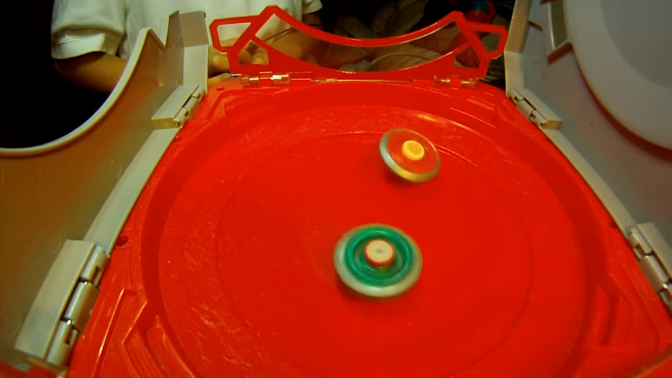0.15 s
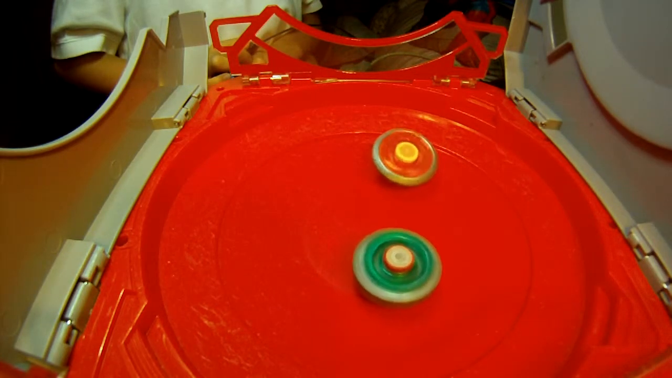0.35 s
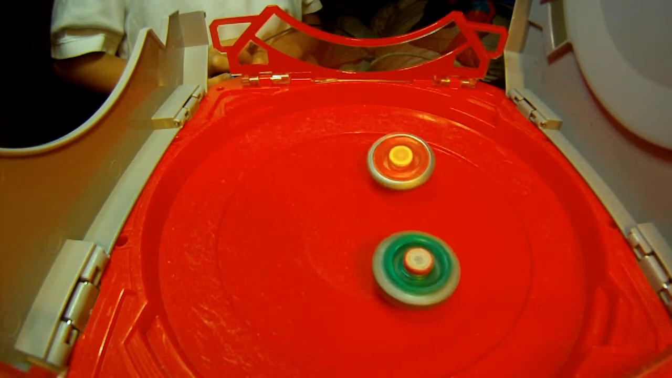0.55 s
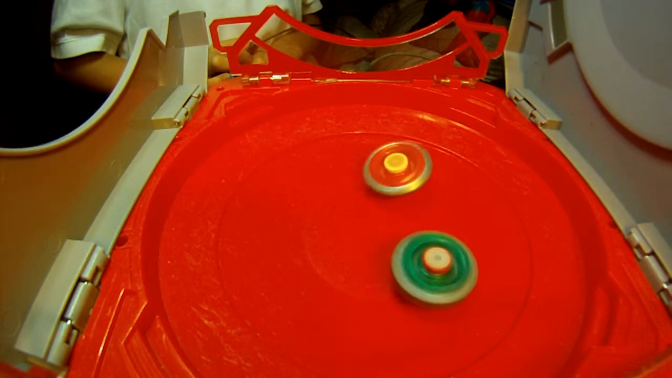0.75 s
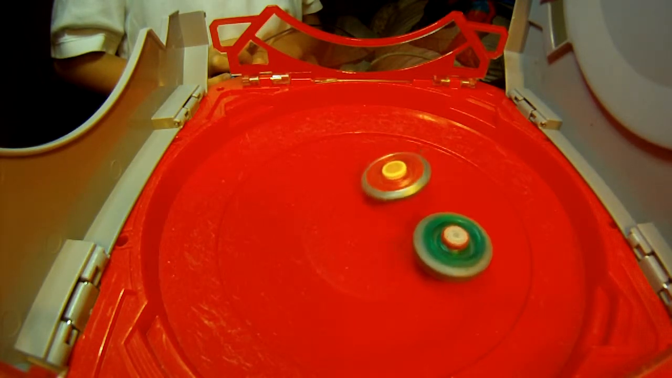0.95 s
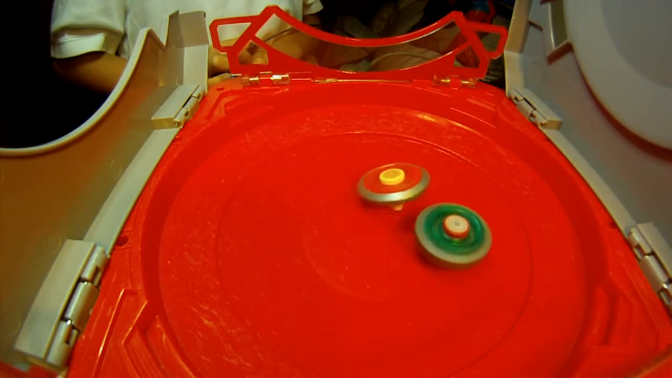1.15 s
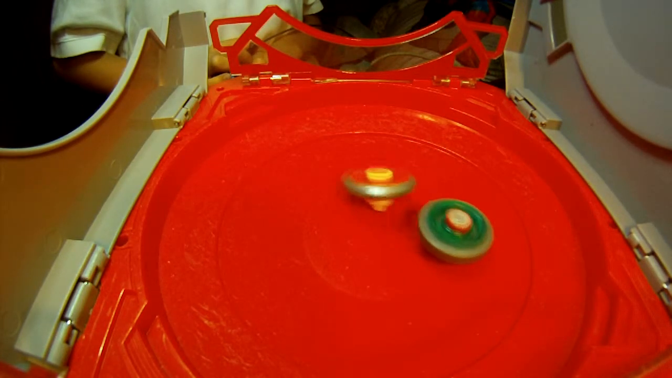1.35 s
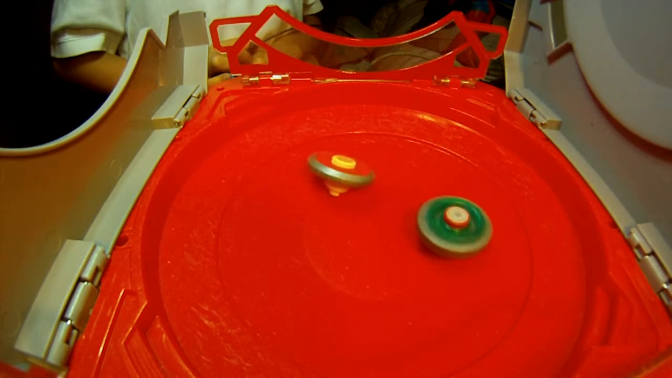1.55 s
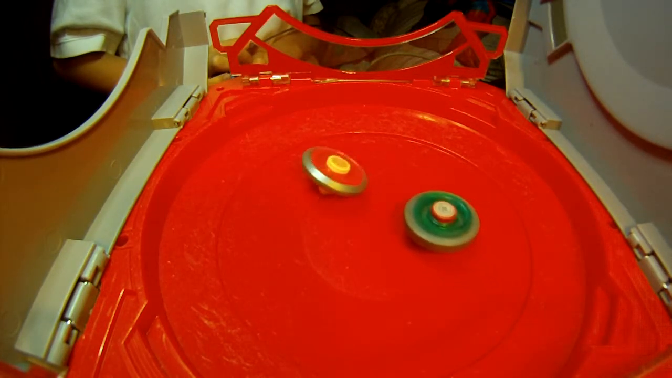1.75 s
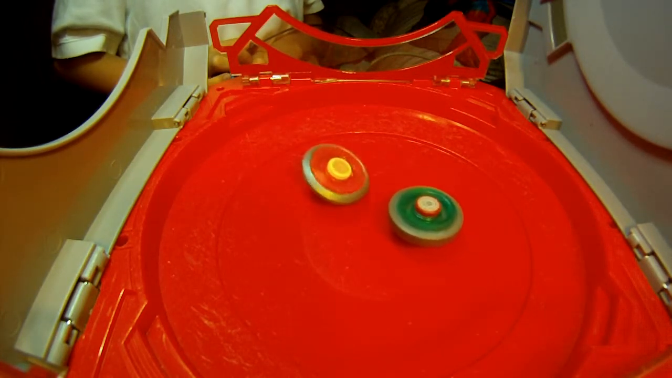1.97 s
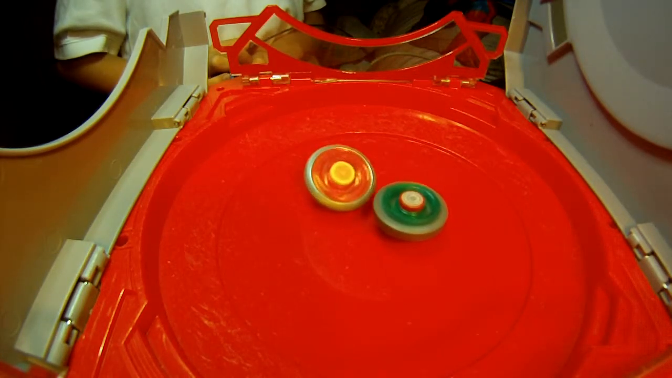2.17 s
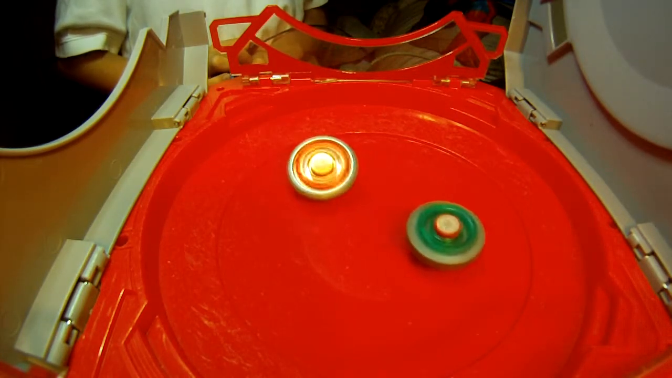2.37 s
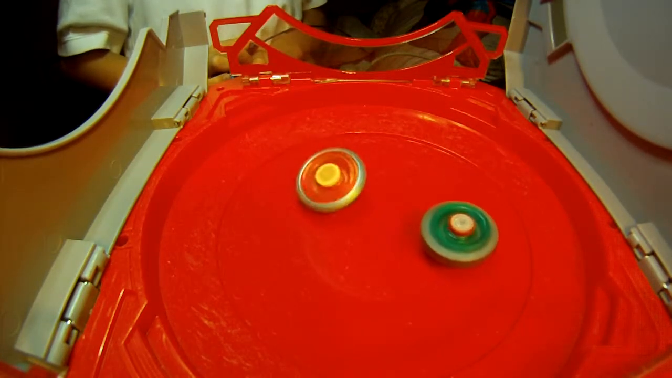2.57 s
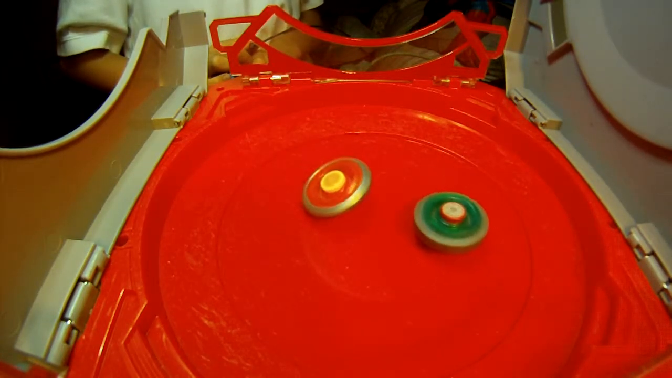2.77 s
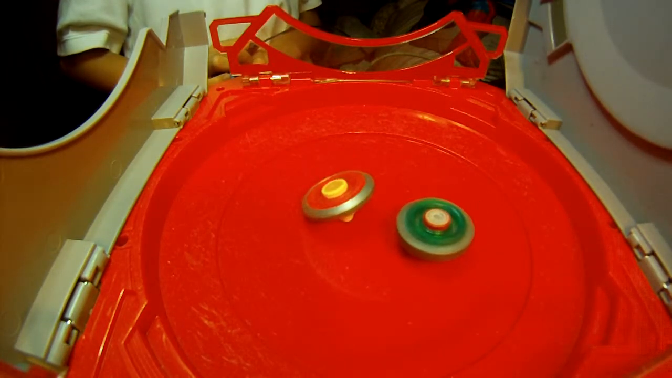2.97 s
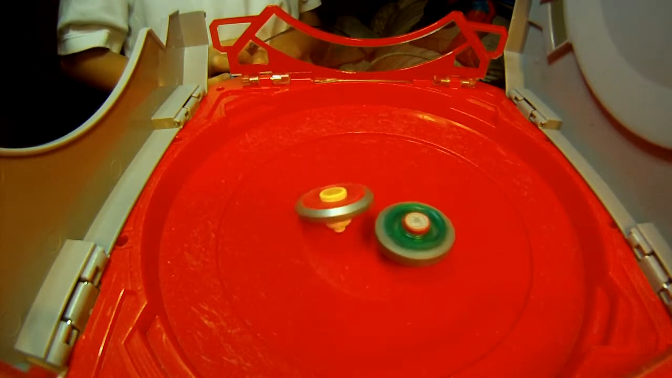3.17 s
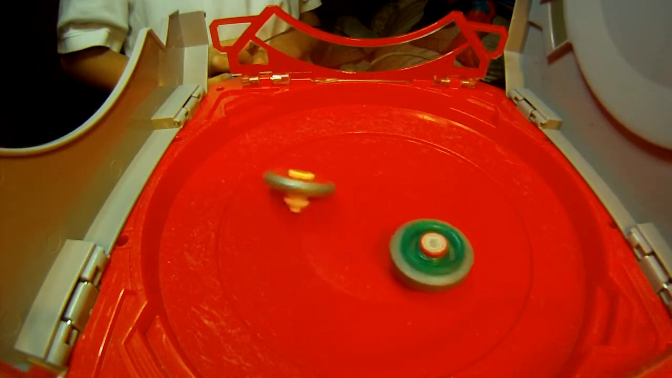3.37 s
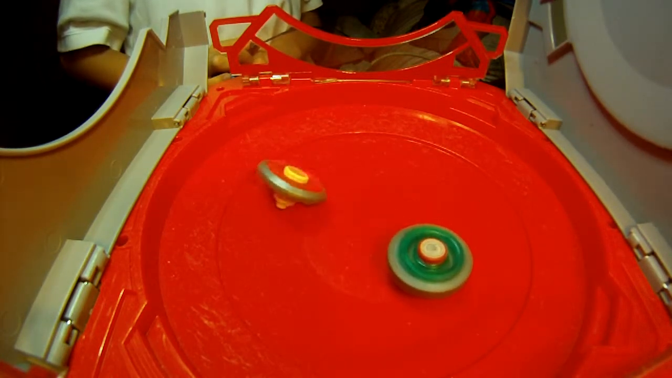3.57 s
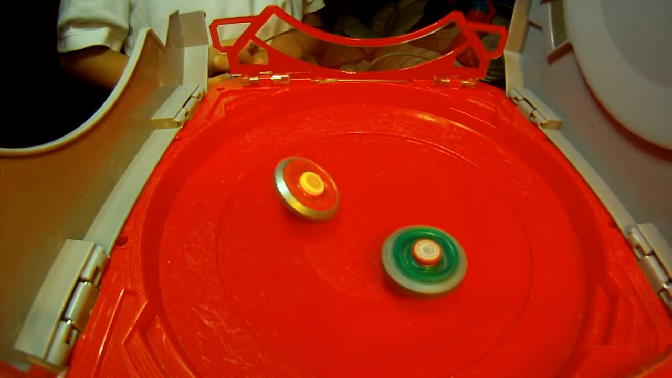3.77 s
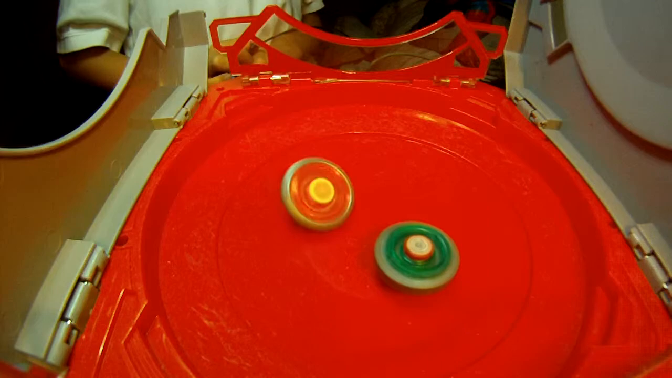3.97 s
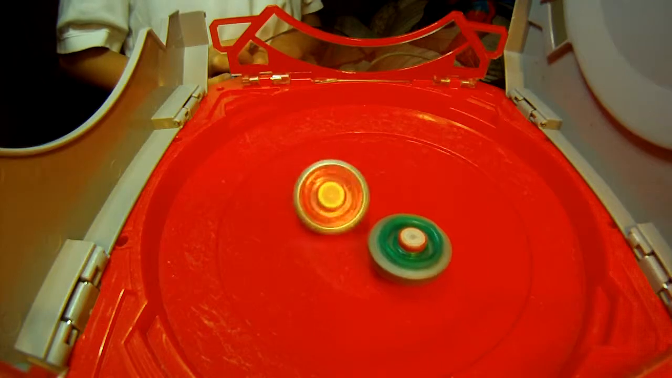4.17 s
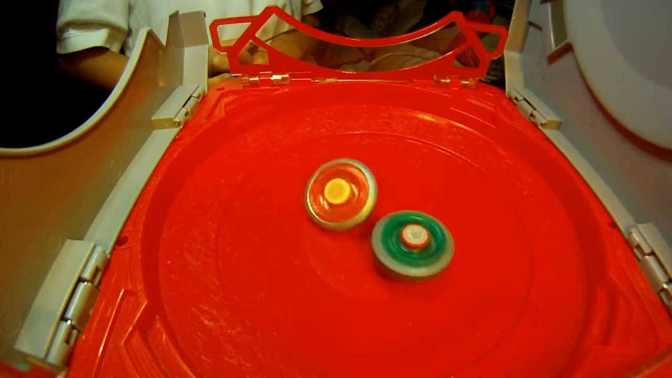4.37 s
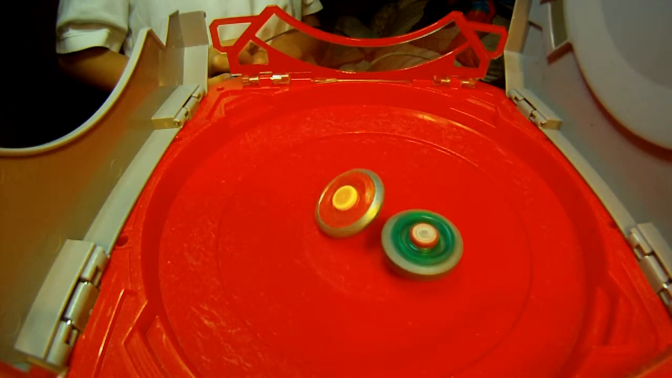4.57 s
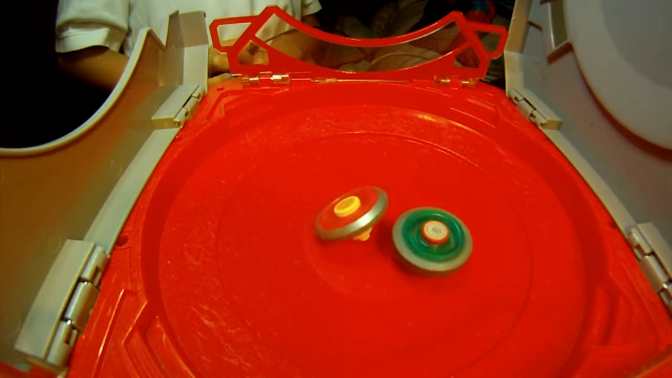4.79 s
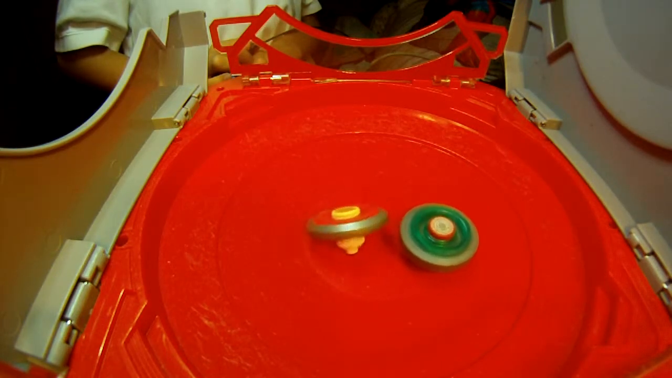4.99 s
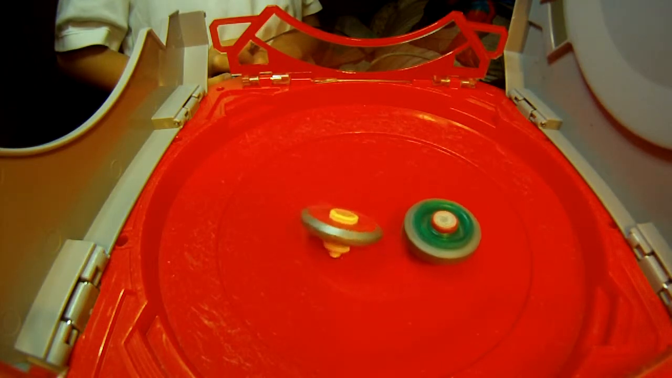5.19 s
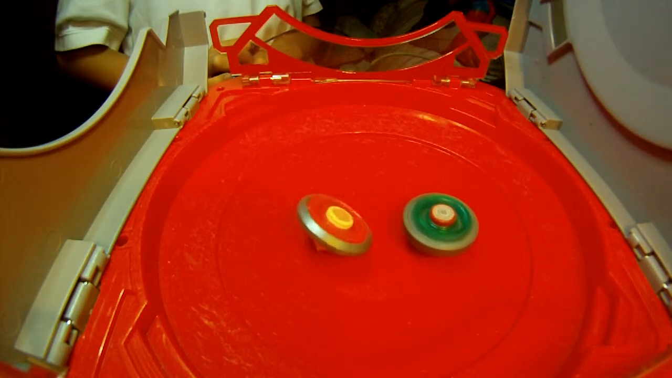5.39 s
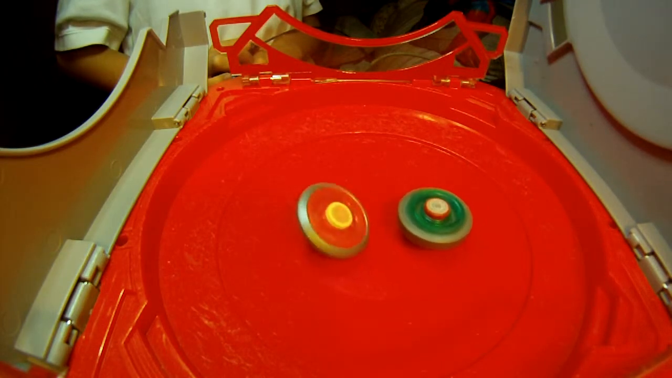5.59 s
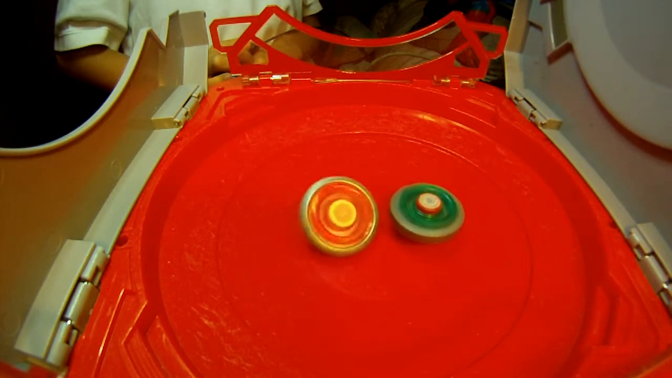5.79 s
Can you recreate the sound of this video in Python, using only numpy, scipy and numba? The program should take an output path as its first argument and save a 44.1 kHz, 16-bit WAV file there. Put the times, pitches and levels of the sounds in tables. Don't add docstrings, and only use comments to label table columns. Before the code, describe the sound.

Two metal-rimmed spinning tops purr quietly in a plastic dish, with five sudden loud clashes of metallic cracks and hollow, rapid knocking.

```python
import sys
import numpy as np
from scipy import signal
from scipy.fft import rfft, irfft, next_fast_len
from scipy.io import wavfile
from scipy.ndimage import uniform_filter1d, map_coordinates
from numba import njit

SR = 44100
rng = np.random.default_rng(int(sys.argv[2]) if len(sys.argv) > 2 else 0)


def output_pcm(signal):
    pcm = np.clip(np.atleast_2d(signal).T, -1, 1) * 32767
    wavfile.write(sys.argv[1], SR, np.round(pcm).astype(np.int16))


def invert_db(level):
    return 10 ** (np.asarray(level, dtype=float) / 20)


N = 257544

# (time [s], dish ring [Hz], grit against the knock [dB], jolt to the load [dB], settling time [s])
CLASHES = [
    (0.057, 471, -22, 11, 0.041),
    (1.417, 454.4, -18.5, 14.5, 0.58),
    (2.311, 455, -20, 6, 0.55),
    (3.346, 486.4, -18, 17.5, 0.094),
    (4.412, 495, -17.5, 0.5, 0.16),
]
# (time [s], peak [dB], rocking time [ms], second landing against the first [dB])
HOPS = [(.056, -8.5, 10.8, -1.5), (0.0802, -7.5, 11.4, 1), (0.1064, -7, 11, 0.5), (.136, -8.5, 10.1, -2),
        (.159, -15, 7.5, -4.5), (1.4192, -3, 6.2, -39), (1.451, -2, 14, -1.5), (1.482, -25, 7.6, 5),
        (1.5084, -5.5, 5.9, -5.5), (1.5216, -10.5, 12.1, 5), (1.552, -14.5, 11.6, 2),
        (2.3168, -16.5, 4.9, 4.5), (2.3369, -13, 14.2, 8), (2.3638, -4.5, 9.6, -38),
        (2.3879, -6.5, 8.9, -9), (2.4049, -12, 7.9, -2.5), (3.349, -17, 8.5, 8), (3.3684, -7.5, 15.1, -11),
        (3.393, 2, 20.4, -49), (3.4212, -9.5, 21, -7), (3.45, -11.5, 11, 4), (3.4784, -5.5, 9.1, -5),
        (3.502, -7, 14.4, -6), (3.5295, -10.5, 10.6, -0.5), (3.5487, -16, 14.2, -4),
        (4.4116, -17, 9.7, 9.5), (4.4277, -17, 18.8, 16), (4.4731, -10.5, 8.1, -4),
        (4.4878, -17, 5.8, -2.5)]


def unit(x):
    return x / np.sqrt(np.mean(x ** 2) + 1e-20)


def even(x, s):
    return x / np.sqrt(np.abs(uniform_filter1d(x ** 2, int(s * SR))) + 1e-20)


def along(points, hz):
    f, v = np.transpose(points)
    return np.interp(np.log(hz + 1), np.log(f + 1), v)


def curves(rows):
    s, *cols = np.transpose(rows)
    return [np.interp(np.arange(N) / SR, s, c) for c in cols]


def filtered(x, response):
    m = next_fast_len(len(x) + SR // 2)
    return irfft(rfft(x, m) * response(np.fft.rfftfreq(m, 1 / SR)), m)[:len(x)]


def modes(rows):
    def response(f):
        total = 0
        for k, (centre, width, db) in enumerate(rows):
            peak = 1j * f * width / (centre * centre - f * f + 1j * f * width)
            total = total + (-1) ** k * invert_db(db) * peak
        return total
    return response


def hiss(spectrum):
    return unit(filtered(rng.standard_normal(N), lambda hz: invert_db(along(spectrum, hz))))


@njit
def sliding(x, turn, radius):
    y = np.zeros(len(x))
    for i in range(2, len(x)):
        y[i] = x[i] - x[i - 2] + 2 * radius * np.cos(turn[i]) * y[i - 1] - radius ** 2 * y[i - 2]
    return y


def resonate(x, hz, width):
    return unit(sliding(x, 2 * np.pi * hz / SR, np.exp(-np.pi * width / SR)))


def room(x):
    # (frequency [Hz], time to fall 60 dB [s])
    decay_times = [(200, 0.2), (600, 0.2394), (2500, 0.4), (5500, 0.33)]
    hz, t, z = signal.stft(rng.standard_normal(SR // 2), SR, nperseg=256)
    fade = invert_db(-60 * t / along(decay_times, hz)[:, None])
    tail = signal.istft(z * fade, SR, nperseg=256)[1]
    return signal.fftconvolve(np.pad(x, (200, 0)), tail / np.linalg.norm(tail))[:N]


def rumble():
    # (frequency [Hz], level per Hz [dB])
    rumble_spectrum = [(12, -47.5), (20, -14.5), (109, -3.5), (145, -4.5), (204, 2.5), (295, -15), (520, 1),
                       (640, -24), (700, -53), (910, -52), (1540, -120)]
    return invert_db(-50.5) * hiss(rumble_spectrum)


def track(turns, memory, fresh, count=64):
    field = rng.standard_normal((int(turns[-1] / memory) + 3, count))
    bumps = map_coordinates(field, [turns / memory, turns % 1 * count], mode="grid-wrap")
    grit = map_coordinates(rng.standard_normal(int(turns[-1] * count) + 3), [turns * count])
    return unit(bumps) + fresh * unit(grit)


def once_a_turn(turns, at, sharp):
    return np.exp(sharp * (np.cos(2 * np.pi * (turns - at)) - 1))


def rattle(turns):
    # (start [s], end [s], level [dB])
    loose_spell = (.2, .85, -79)
    start, end, db = loose_spell
    t = np.arange(N) / SR
    loose = track(turns, memory=8, fresh=.8, count=400) * once_a_turn(turns, at=0, sharp=3.5)
    loose = loose * (t > start) * (t < end)
    wheel = modes([(2100, 150, -9), (3530, 120, 4), (3980, 140, -2), (4570, 410, -4)])
    return invert_db(db) * unit(filtered(loose, wheel))


def scrape(turns, pressure_db):
    # (frequency [Hz], level per Hz [dB])
    scrape_spectrum = [(380, -32.5), (650, -2.5), (932, 0), (1000, -5.5), (1200, -3.5), (1300, -8),
                       (1580, -7.5), (3010, -7), (3550, -11), (4950, -12.5), (5900, -10.5), (7670, -57),
                       (13000, -120)]
    t = np.arange(N) / SR
    drag_db = 5.5 * np.exp(-((t - 5.05) / 0.14) ** 2)
    db = -62 + 0.092 * (pressure_db + 49.5) + drag_db
    rub = hiss(scrape_spectrum) * (1 + .35 * once_a_turn(turns, at=-.1, sharp=4))
    return invert_db(db) * unit(rub)


def rap(turns, high_hz, pressure_db):
    t = np.arange(N) / SR
    lean_db = 20.5 * np.exp(-((t - 4.994) / 0.4) ** 2)
    db = -77.5 + 0.39 * (pressure_db + 46.5) + lean_db
    landing = np.diff(np.floor(turns - .01), prepend=0)
    landing = landing + 0.3 * np.diff(np.floor(turns + 0.17), prepend=0)
    landing = landing * invert_db(1.8 * rng.standard_normal(N))
    shell = modes([(880, 130, 3), (1200, 250, -2), (1550, 300, -8)])
    hit = unit(filtered(landing, lambda f: shell(f) / (1 + 1j * f / 1500) ** 2))
    return invert_db(db) * (hit + 3.7 * resonate(resonate(landing, high_hz, 56), high_hz, 390))


def thump(turns, low_hz, wobble_db):
    t = np.arange(N) / SR
    push = track(turns, memory=8, fresh=0.18) * once_a_turn(turns, at=0.12, sharp=0.44)
    deep = np.minimum(invert_db(-0.9 * (wobble_db + 47.5)) * np.exp(-t / 2.87), 1.3)
    body = resonate(resonate(push, low_hz, 26.0), low_hz, 90.7)
    body = body + deep * unit(filtered(push, modes([(132.7, 26, 0)])))
    return invert_db(wobble_db) * even(body, 0.16)


def tick(turns, high_hz, pressure_db):
    tap = track(turns, memory=14, fresh=.3) * once_a_turn(turns, at=-.03, sharp=1.2)
    body = resonate(tap, high_hz, 35) + .5 * resonate(tap, .8 * high_hz, 117.6)
    body = resonate(body, 0.65 * high_hz, 130)
    body = resonate(body, 0.89 * high_hz, 200)
    body = unit(filtered(body, lambda f: 1 / (1 + (f / 660) ** 12)))
    body = body + 0.49 * unit(filtered(tap, lambda f: modes([(350, 90, 0)])(f) ** 2))
    return invert_db(pressure_db) * even(body, 0.26)


def clash_of(s):
    return max(c for c in CLASHES if c[0] <= s + .005)


def last_hops():
    return [max(h for h in HOPS if clash_of(h[0]) == c) for c in CLASHES]


def load():
    # (time [s], wobble [dB], tip pressure [dB])
    calm_load = [(0, -45, -56), (.56, -54, -58.5), (.8, -48, -54), (.93, -42.5, -44.5), (1.15, -47, -51.5),
                 (1.4, -50.5, -51), (1.93, -50.5, -59), (2.08, -56.5, -59.5), (2.3, -53.5, -62.5),
                 (2.72, -45, -45), (3.2, -58.5, -55.5), (3.85, -50, -56), (4.27, -41, -42.5),
                 (4.55, -46, -50.5), (4.95, -52.5, -45), (5.45, -46, -45), (5.7, -42, -45),
                 (5.84, -47, -47)]
    t = np.arange(N) / SR
    jolt_db = np.zeros(N)
    for (s, _, _, db, settle), hop in zip(CLASHES, last_hops()):
        jolt_db += db * (t > s) * np.exp(-np.maximum(t - hop[0] - .04, 0) / settle)
    return [c + jolt_db for c in curves(calm_load)]


def whir():
    # (time [s], turns of the louder top so far [turns])
    spin = [(-0.0414, 0), (0.4266, 17), (0.8153, 31), (0.8614, 32), (1.3945, 49), (1.8482, 63),
            (2.2768, 76), (2.7808, 91), (3.3227, 107), (3.664, 116), (4.3951, 136), (4.5467, 140),
            (4.9547, 151), (5.4036, 163), (5.9325, 177)]
    # (time [s], low mode [Hz], high mode [Hz])
    place = [(0, 228.5, 550), (.25, 191, 475), (.8, 181.6, 522), (1, 218.6, 550), (1.4, 234.4, 590),
             (1.6, 233.4, 489), (1.9, 231.7, 554), (2.25, 229.4, 582.6), (2.5, 220.4, 495),
             (2.85, 232.5, 584), (3.3, 245, 634), (3.65, 232.3, 465), (3.9, 250.2, 503),
             (4.2, 237.8, 547.6), (4.4, 225.8, 601), (5, 221, 579), (5.35, 223.7, 571), (5.84, 239.2, 582)]
    wobble_db, pressure_db = load()
    low_hz, high_hz = curves(place)
    turns = curves(spin)[0]
    tones = thump(turns, low_hz, wobble_db) + tick(turns, high_hz, pressure_db)
    contact = rap(turns, high_hz, pressure_db) + scrape(turns, pressure_db)
    return tones + contact + rattle(turns)


def clinks():
    # (time [s], peak [dB], broad band [Hz], narrow band [Hz], narrow band level [dB])
    contacts = [(0.054, -19.5, 2730, 4990, -2), (0.0677, -21, 3100, 5150, -13),
                (0.8324, -53, 2870, 3740, -25), (1.419, -13, 4360, 1550, -2), (1.437, -41, 3100, 4400, -10),
                (1.4471, -21.5, 1300, 3700, -17), (1.98, -50, 2980, 3910, 2.5),
                (2.311, -41, 3180, 3650, -0.5), (2.3167, -10, 1960, 2990, -17),
                (2.57, -47, 2730, 3660, -25), (3.349, -20, 4370, 1650, -2), (3.364, -15, 1510, 2950, -12),
                (3.393, -28, 1470, 2780, -9), (4.4109, -12.5, 3440, 4830, -20),
                (4.4218, -17, 2660, 3840, -39), (5.173, -54.5, 1500, 4010, -24),
                (5.6417, -26.5, 1200, 2380, -1), (5.6884, -33, 1650, 2250, 0),
                (5.6961, -37.5, 1690, 3100, -8), (5.7966, -47, 3280, 3300, 1),
                (5.8056, -41, 2750, 5000, -27)]
    # (centre [Hz], width [Hz], level [dB])
    rim = [(1200, 290, -9), (1650, 280, -5.5), (2116, 860, -6.5), (3100, 1100, 3), (4447, 530, 2.5),
           (5000, 1600, -1)]
    # (time [s], first wheel level [dB], second wheel level [dB])
    rings = [
        (.055, -55, -34),
        (1.421, -35.5, -28.5),
        (2.314, -48, -26.5),
        (3.348, -41, -59),
        (3.364, -68, -32),
        (4.41, -48, -56),
    ]
    # (frequency [Hz], level [dB], time to fall 60 dB [s])
    first_wheel = [(2859, -14, .5), (3079, 2, .33), (3165, -3, .3), (3924, -12, .32), (4231, -3, .66),
                   (4296, -9, .5), (4363, -4, .66)]
    second_wheel = [(2640, -6, .2), (2907, -3, .15), (3850, -7, .3), (3984, -4, .25), (4360, -15, .45),
                    (4985, -3, .16), (5679, -8, .3)]
    t = np.arange(SR * 3 // 4) / SR
    out = np.zeros(N + SR)
    for s, db, hz, upper_hz, upper_db in contacts:
        t60 = 0.091 * 2 ** ((db + 11.5) / 41.5)
        u = t[:SR // 4]
        burst = rng.standard_normal(len(u)) * (invert_db(-60 * u / t60) + 1.6 * invert_db(-60 * u / 0.019))
        burst[0] = 9
        own = modes([(hz, 320, 0.5), (upper_hz, 130, upper_db + 6)])
        crack = filtered(burst, lambda f: modes(rim)(f) + own(f))
        out[round(s * SR):][:len(u)] += invert_db(db - 0.5) * crack
    for s, *levels_db in rings:
        for db, wheel in zip(levels_db, (first_wheel, second_wheel)):
            for f, level, decay in wheel:
                fade = invert_db(db + level + rng.normal(0, 0.81) - 60 * t / decay)
                out[round(s * SR):][:len(t)] += fade * np.sin(2 * np.pi * f * t)
    return out[:N]


def landings():
    # (time [s], peak [dB], dish ring [Hz], grit against the knock [dB])
    taps = [
        (0.8335, -31.5, 450, -12),
        (2.8451, -28.5, 470, -31),
        (4.7278, -25, 470, -23),
        (5.171, -31.5, 504, -34),
    ]
    rows = []
    for s, db, ms, second_db in HOPS:
        rows += [(s, db, 0), (s + ms / 1000, db + second_db, 1)]
    for s, db, ms, second_db in last_hops():
        for k in range(1, 5):
            rows.append((s + ms / 1000 + k * .008, db + second_db - k * 6.5, 1))
    full = []
    for s, db, rocking in rows:
        start, hz, grit_db = clash_of(s)[:3]
        ring_hz = hz * (1 + 0.042 * rng.standard_normal())
        grit_db = grit_db + 0.083 * (db + 16.5)
        grit_db += 1.5 * rng.standard_normal() - 2 * rocking
        grit_db += 6.5 * np.exp((start - s) / 0.0051)
        full.append((s, db, ring_hz, grit_db))
    return full + taps


def dish_wave(u, hz):
    return np.sin(2 * np.pi * hz * u) * invert_db(-60 * u / 0.024) * (1 - np.exp(-u / 0.0016)) ** 2


def knocks():
    # (centre [Hz], width [Hz], level [dB])
    dish_modes = [(76.5, 41, -25), (125.3, 11, -5.5), (241.4, 51, -8), (372, 97, -13), (465.3, 22.4, -8.5),
                  (590, 11, -12.5), (821, 60, -12), (1200, 290, -18)]
    # (centre [Hz], width [Hz], level [dB])
    click_modes = [(1160, 300, -4), (2360, 500, -4), (2950, 480, 1.8), (4400, 6800, -7)]
    t = np.arange(SR // 10) / SR
    out, grit, blows = np.zeros(N + SR), np.zeros(N + SR), np.zeros(N)
    for s, db, hz, click_db in landings():
        i = round(s * SR)
        echo = dish_wave(np.maximum(t - .0048, 0), hz)
        out[i - 8:][:len(t)] += invert_db(db + 9) * (dish_wave(t, hz) + 0.06 * echo)
        click = rng.standard_normal(len(t)) * invert_db(-60 * t / 0.034)
        grit[i:][:len(t)] += invert_db(db + click_db + 6) * click
        blows[i] = -invert_db(db + 37.5)
    clicks = filtered(grit[:N], lambda f: modes(click_modes[1:])(f) / (1 + 1j * f / 3770) ** 2 * 2.2)
    shake = filtered(blows, lambda f: modes(dish_modes)(f) / (1 + 1j * f / 900) / (1 + 1j * f / 1600))
    return out[:N] + clicks + shake


def scene():
    low, high = knocks(), clinks()
    echoes = invert_db(-15) * room(low) + invert_db(-14) * room(high)
    return (rumble() + whir() + high + low + echoes)[None]


def low_pass(x):
    return signal.sosfilt(signal.butter(12, 16300, fs=SR, output="sos"), x)


def record(dry):
    hold_hz = 12000
    x = filtered(dry[0], lambda hz: 1 / (1 + (hz / 5500) ** 12))
    x = x / (1 + np.abs(x / 1.1) ** 8) ** (1 / 8)
    slow = signal.resample_poly(x, hold_hz // 300, SR // 300)
    held = signal.resample_poly(np.repeat(slow, 4), SR // 300, hold_hz // 75)[6:]
    held = filtered(np.pad(held, (0, 16))[:N], lambda hz: 1 / (1 + (hz / 15400) ** 70))
    return low_pass(held[None])


dry = scene()
out = record(dry)
output_pcm(out)
```